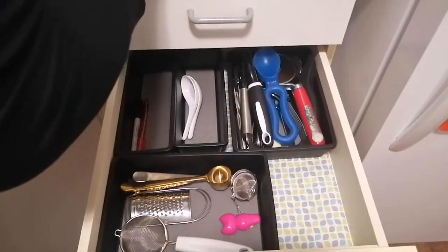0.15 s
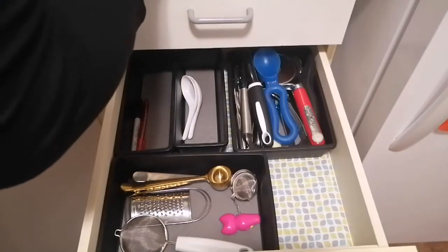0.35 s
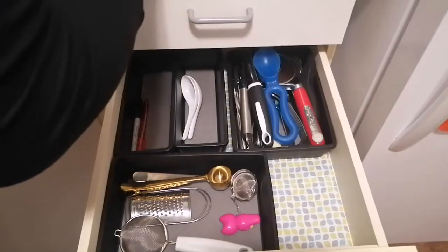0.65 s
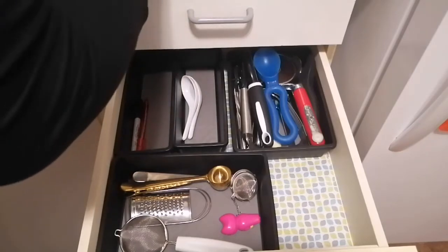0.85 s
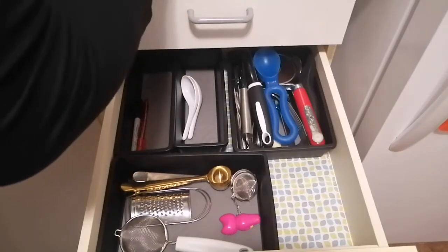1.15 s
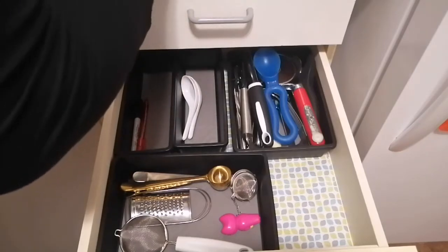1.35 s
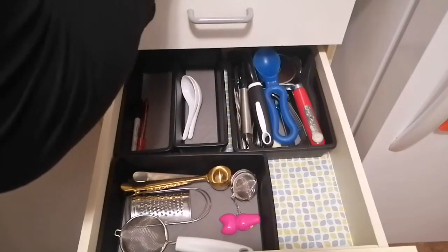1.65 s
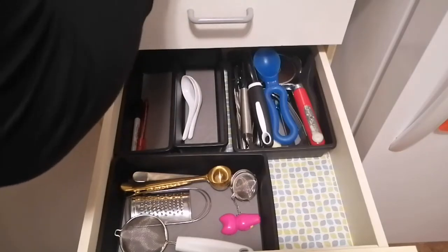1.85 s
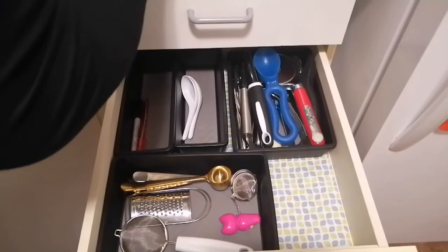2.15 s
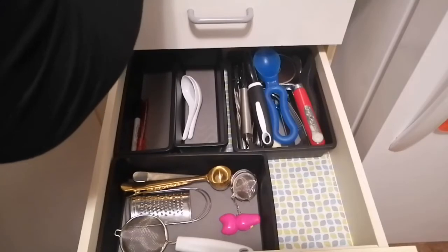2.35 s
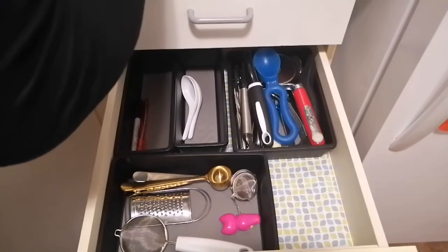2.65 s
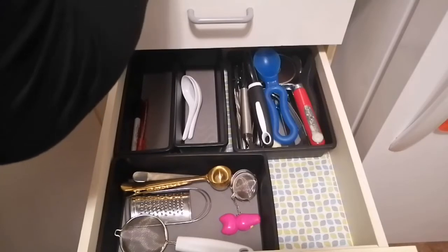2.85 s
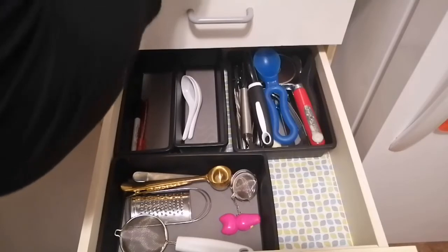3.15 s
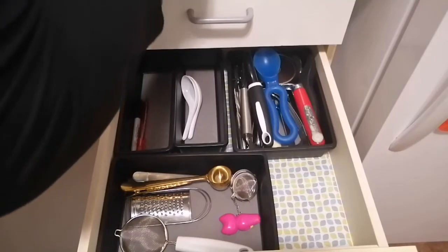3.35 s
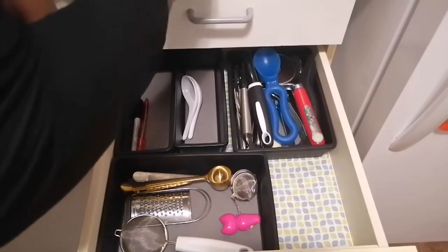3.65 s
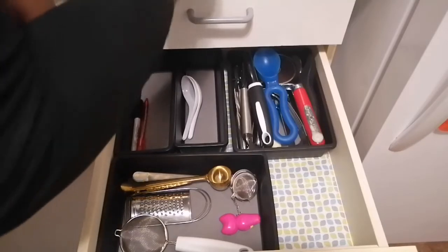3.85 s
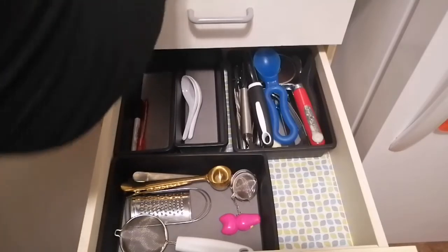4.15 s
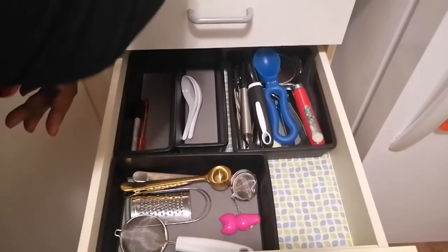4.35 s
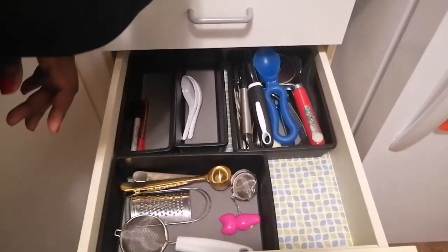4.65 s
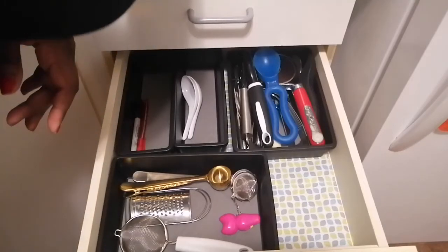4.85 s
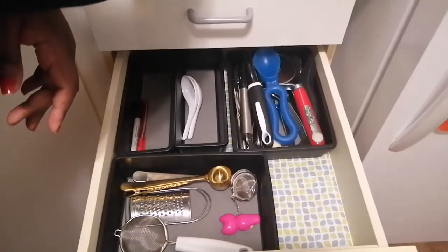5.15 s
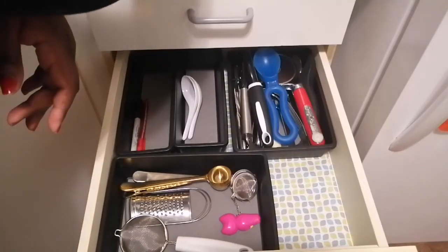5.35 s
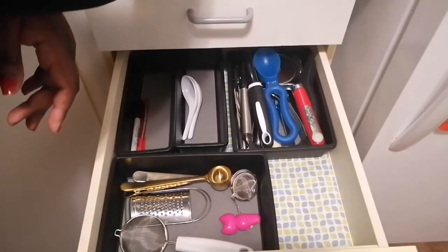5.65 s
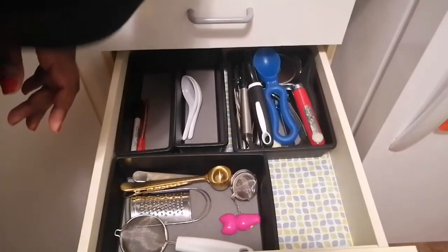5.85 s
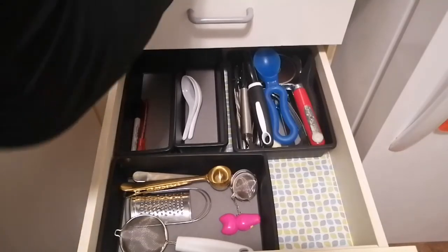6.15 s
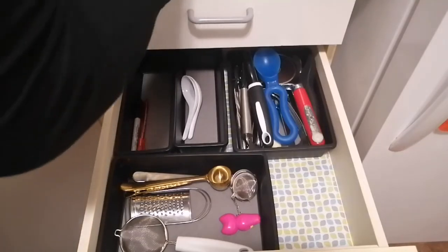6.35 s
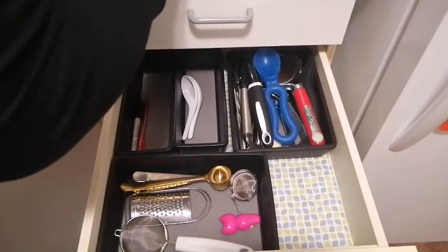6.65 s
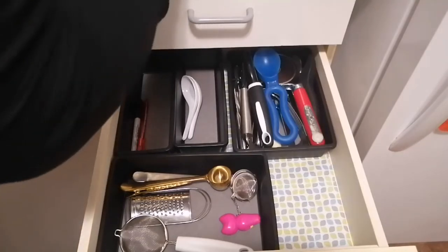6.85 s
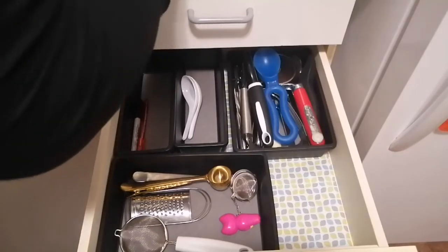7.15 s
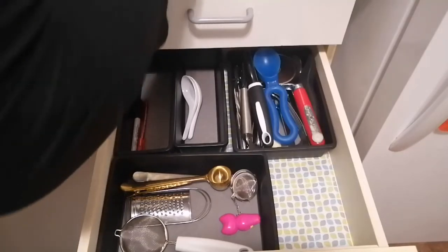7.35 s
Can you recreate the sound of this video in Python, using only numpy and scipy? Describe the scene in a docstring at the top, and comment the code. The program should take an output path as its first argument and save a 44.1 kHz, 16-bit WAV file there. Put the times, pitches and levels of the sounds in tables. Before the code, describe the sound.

Irregular rattling of kitchen utensils in plastic trays, heard from about a metre with short room reverberation. It begins softly with a knock, thump and rub, continues as small double knocks and scrapes, thins out, then a ringing metal clink leads into firmer knocks and one loud clack. A pause, a low cabinet thump and quick high clinks follow, ending in busy light knocking and dragging.

```python
"""A light knock, a soft thump and a gritty rub come first, as someone rummages through a kitchen drawer.
Utensils knock on plastic trays (noise impulses plus tray modes) and metal clinks (beating modes).
Things drag over the tray floor (filtered stick-slip pulses); short resonant noises (such pulses driving
a mode) are scrapes and parts of clinks; the cabinet thumps (decaying modes) over faint air (noise).
The small, hard-walled room adds a short reverberation, heard from a metre or so."""
import sys
import numpy as np
from scipy import signal
from scipy.fft import rfft, irfft
from scipy.io import wavfile

SR = 44100
rng = np.random.default_rng(int(sys.argv[2]) if len(sys.argv) > 2 else 0)


def unload_audio(sound):
    """Save the sound as a 16-bit wav file, at the path given as the first command line argument."""
    columns = np.transpose(np.atleast_2d(sound))
    # keep every value between -1 and 1, then stretch to whole-number steps
    steps = np.round(np.clip(columns, -1, 1) * 32767)
    wavfile.write(sys.argv[1], SR, steps.astype(np.int16))


N = 330750  # samples, 7.5 s
TOP_HZ = 15100  # upper limit of the sound


def undb(db):
    """Amplitude ratio: 20 dB is a factor of ten."""
    return 10 ** (np.asarray(db) / 20)


def rms(x):
    """Effective value: root mean square of all samples."""
    return np.sqrt(np.mean(x ** 2)) + 1e-12


def seconds(length):
    """Uniform sampling: the sample times of a stretch of this length [s]."""
    return np.arange(int(length * SR)) / SR


def fade(t, t60):
    """Viscous damping: exponential decay, 60 dB down after t60 [s]."""
    return np.exp(-np.log(1000) * t / max(t60, 1e-4))


def at_hz(table, hz):
    """Logarithmic pitch: interpolate (frequency, value) points on a log-frequency axis."""
    points, values = np.transpose(table)
    return np.interp(np.log(np.maximum(hz, 1)), np.log(points), values)


def band(x, lo, hi, order=3):
    """Causal Butterworth band-pass: maximally flat between two cut-offs [Hz]."""
    sos = signal.butter(order, [lo, min(hi, SR / 2 - 1)], "band", fs=SR, output="sos")
    return signal.sosfilt(sos, x)


def colour(x, spectrum, size=2048):
    """Minimum phase: folding the cepstrum of a (frequency, dB) spectrum gives a causal filter."""
    gain = undb(at_hz(spectrum, np.fft.rfftfreq(size, 1 / SR)))
    cepstrum = irfft(np.log(gain))
    cepstrum[1:size // 2] *= 2
    cepstrum[size // 2 + 1:] = 0
    impulse = irfft(np.exp(rfft(cepstrum)))
    return signal.fftconvolve(x, impulse)[:len(x)]


def tilted(spectrum, db_per_octave):
    """Contact sharpness: a sharper contact lifts the treble of a spectrum, a blunter one lowers it."""
    return [(hz, db + db_per_octave * np.log2(max(hz, 400))) for hz, db in spectrum]


def boost(x, resonances):
    """Resonance: lift the bands where an object resonates and lower those between its modes."""
    for hz, width, db in resonances:
        x = x + (undb(db) - 1) * band(x, max(hz - width / 2, 30), hz + width / 2, order=1)
    return x


def ring(modes, t, scatter_db, detune):
    """Modal superposition: decaying sines, weighted differently by each contact point."""
    chance = rng.standard_normal((len(modes), 3))
    total = 0
    for (hz, db, t60), (size, shift, sign) in zip(modes, chance):
        amplitude = np.sign(sign) * undb(db + scatter_db * size)
        total = total + amplitude * np.sin(2 * np.pi * hz * (1 + detune * shift) * t) * fade(t, t60)
    return total


def slips(count, rate, spread_db):
    """Stick-slip friction: tiny releases at random moments (rate per s), a few much bigger than the rest."""
    released = rng.random(count) < rate / SR
    direction = rng.choice([-1, 1], count)
    size_db = spread_db * np.minimum(rng.exponential(size=count), 4)
    x = released * direction * undb(size_db)
    return x / rms(x)


def diffuse(count, apart_hz=800):
    """Diffuse field: noise from all sides, more alike at the two microphones in the bass than above."""
    mid, side = rng.standard_normal((2, count))
    high_pass = signal.butter(1, apart_hz, "high", fs=SR, output="sos")
    side = 0.22 * side + 0.8 * signal.sosfilt(high_pass, side)
    return np.array([mid + side, mid - side])


def reverberation():
    """Frequency-dependent absorption: each octave of a noise tail dies at its own rate; unit energy."""
    # decay time of the kitchen: (frequency [Hz], t60 [s])
    decay_times = [(120,0.29),(400,0.28),(1000,0.26),(3000,0.35),(7000,0.33),(13000,0.056)]
    t = seconds(.6)
    spectrum, hz = rfft(diffuse(len(t))), np.fft.rfftfreq(len(t), 1 / SR)
    octave = np.clip(np.log2(np.maximum(hz, 1) / 125), 0, 7)
    tail = 0
    for k in range(8):
        weight = np.maximum(1 - abs(octave - k), 0)  # overlapping triangles
        tail = tail + irfft(spectrum * weight, len(t)) * fade(t, at_hz(decay_times, 125 * 2 ** k))
    tail = tail * (1 - fade(t, 0.0054))  # reflections build up after the direct sound
    return tail / np.sqrt(np.sum(tail ** 2) / 2)


def in_kitchen(x, direct_db, tail):
    """Convolution with a room response: direct sound, up to 3 samples later on the right, plus its tail."""
    response = tail.copy()
    response[0, 0] += undb(direct_db)
    response[1, rng.integers(4)] += undb(direct_db)
    return signal.fftconvolve(x[None], response, axes=1)[:, :len(x)]


def onset_level(x, db):
    """Onset level: scale a sound so that its first 25 ms have this rms level [dB]."""
    return x * undb(db) / rms(x[:, :SR // 40])


def add(out, s, sound):
    """Linear superposition: mix a stereo sound in at time s [s]."""
    start = max(int(s * SR), 0)
    out[:, start:start + sound.shape[1]] += sound[:, :N - start]


def room_tone():
    """Stationary diffuse noise: the faint steady air of the kitchen."""
    # spectrum of the air: (frequency [Hz], relative level [dB])
    air_spectrum = [(12, -31), (20, 2.5), (674, -15), (1080, -12.5), (1210, -17), (1550, -13.5),
                    (1830, -19), (2550, -17), (3360, -22), (5850, -23.5), (8380, -33), (9630, -27.5),
                    (15000, -55)]
    gain = undb(at_hz(air_spectrum, np.fft.rfftfreq(N, 1 / SR)))
    air = irfft(rfft(diffuse(N, apart_hz=25)) * gain, N)
    return air / rms(air) * undb(-67)


def thumps(tails):
    """Forced, then free vibration: a soft push swells one low panel mode, which then dies away."""
    # bumps against the cabinet: (time [s], onset level [dB], mode [Hz], push length [s])
    bumps = [(0.0,-57.5,156,0.005),(1.478,-53,152,0.042),(2.385,-55.5,155,0.022),(2.54,-53,152,0.014),(3.20,-65,207,0.047),(3.998,-51.5,169,0.025),(4.004,-66,310,0.0073),(6.138,-47,198,0.035),(6.139,-65,88,0.048),(6.14,-59,327,0.0069)]
    out, t = np.zeros((2, N)), seconds(.5)
    for k, (s, db, hz, length) in enumerate(bumps):
        peak_s = length / 2  # the push is strongest halfway; the mode decays from there
        swell = np.sin(np.pi / 2 * np.minimum(t / peak_s, 1)) ** 2
        panel = np.sin(2 * np.pi * hz * t) * swell * fade(np.maximum(t - peak_s, 0), 0.066)
        wet = in_kitchen(panel, direct_db=0.5, tail=tails[k % len(tails)])
        add(out, s, onset_level(wet, db))
    return out


def resonant_noises(tails):
    """Pulse-driven resonance: random pulses excite a mode whose frequency sags during each short noise."""
    # short resonant noises: edges scraping or squeaking over plastic, and noisy parts of the metal clinks:
    # (time [s], length [s], level [dB], midway resonance [Hz], resonance width [Hz])
    bursts = [(0.0,0.24,-71,3060,197), (0.0,0.27,-69.5,860,108), (0.238,0.019,-45,676,460),
              (0.322,0.012,-49,570,344), (0.345,0.036,-60,400,153), (0.613,0.015,-46,3500,1800),
              (0.63,.05,-53.5,640,500), (0.89,0.053,-71.5,2610,160), (1.0,0.046,-74.5,10700,3000),
              (1.36,0.034,-66,1045,300), (1.965,0.034,-52.5,2080,794), (1.965,0.07,-60.5,560,400),
              (2.14,.15,-64.5,1186,240), (2.17,0.11,-64,2140,600), (2.5,0.044,-54.5,2100,940),
              (2.86,0.15,-67.5,3730,1330), (3.11,0.067,-71,1610,149), (3.472,0.014,-61,2150,218),
              (3.50,.059,-58,670,254), (3.52,0.13,-64.5,3600,1200), (3.585,0.036,-50.5,613,200),
              (3.655,0.037,-61,1970,220), (3.675,0.025,-50,5300,1500), (3.925,0.03,-68,2250,447),
              (4.06,0.035,-61.5,2270,496), (4.745,.072,-47,470,460), (4.762,0.022,-53,3180,200),
              (4.815,0.027,-48,436,450), (4.89,0.043,-59,815,387), (4.9,0.027,-54,2440,1300),
              (5.78,.052,-48,1980,950), (5.83,0.073,-61,1480,900), (6.29,0.031,-69,4800,1200),
              (6.29,.05,-46.5,10700,1800), (6.325,0.016,-56.5,2550,150), (6.64,0.0255,-49,1550,295),
              (6.714,0.016,-40,554,345), (6.745,0.015,-59,416,170), (6.922,0.027,-49,620,255),
              (6.965,0.084,-46.5,615,240), (7.065,0.012,-40,670,418), (7.105,0.018,-51.5,430,185),
              (7.25,0.13,-59,4030,2450), (7.28,0.079,-55,377,124), (7.44,0.091,-59,1700,910)]
    sag = 0.02  # share by which the resonance falls during a burst
    out, t = np.zeros((2, N)), seconds(.6)
    for k, (s, length, db, hz, width_hz) in enumerate(bursts):
        progress = np.minimum(t / max(length, .005), 1)
        strength = np.sqrt(abs(np.sin(np.pi * progress)))
        push = slips(len(t), rate=1100, spread_db=3.0) * strength
        # shift the moving resonance to 0 Hz, low-pass there, and shift back
        turn = np.exp(2j * np.pi * np.cumsum(hz * (1 + sag * (.5 - progress))) / SR)
        low_pass = signal.butter(2, width_hz / 2, fs=SR, output="sos")
        tone = np.real(turn * signal.sosfilt(low_pass, push / turn))
        wet = in_kitchen(band(tone, 307, 6400), direct_db=-0.5, tail=tails[k % len(tails)])
        add(out, s, wet * undb(db) / rms(wet[:, progress < 1]))
    return out


def drag(tails):
    """Stick-slip under varying load: gritty slips of plastic on plastic follow the hand's pressure."""
    # strokes over the trays: (time [s], length [s], level [dB], brightness [dB per octave])
    strokes = [(0.0,0.084,-62.5,-1.5), (0.33,0.52,-73,-3), (0.59,0.12,-54,1), (0.84,0.18,-80,3),
               (1.27,0.15,-67,0.5), (1.55,0.44,-80,1.5), (1.91,0.26,-59,0), (2.08,0.29,-64.5,0),
               (2.46,0.092,-63,-2), (2.8,0.17,-68,1), (2.99,0.22,-69.5,2.5), (3.24,0.19,-72,-0.5),
               (3.42,0.12,-63,5), (3.58,.2,-101,-15), (4.665,0.2,-54.5,3.5), (4.89,0.026,-54.5,2),
               (5.02,0.11,-57,7), (5.25,0.15,-57,1.5), (5.54,0.24,-67,3.5), (5.79,0.17,-55.5,4),
               (6.7,0.13,-55.5,.5), (6.92,0.057,-55,5), (7.09,0.18,-65,-3), (7.23,0.22,-57,2)]
    # spectrum of the rub before tilting: (frequency [Hz], relative level [dB])
    rub_spectrum = [(59, -61), (100, 9), (268, 1), (383, -1.5), (546, -3), (923, 1.5), (1240, -4.5),
                    (1560, -1), (1810, -9.5), (2180, -3), (2750, -9.5), (5600, -18), (15000, -38)]
    low_hz = 130  # the trays radiate little below this
    swell, let_go_s = 0.05, 0.016  # pressure builds over this share of a stroke, holds, then drops
    out, t = np.zeros((2, N)), seconds(1)
    for k, (s, length, db, brightness) in enumerate(strokes):
        rise = t / (swell * length)
        drop = 1 - (t - length) / let_go_s
        pressure = np.clip(np.minimum(rise, drop), 0, 1)
        rub = pressure * slips(len(t), rate=900, spread_db=6)
        grit = colour(rub, tilted(rub_spectrum, brightness))
        wet = band(in_kitchen(grit, direct_db=-8.5, tail=tails[k % len(tails)]), low_hz, TOP_HZ)
        add(out, s, wet * undb(db) / rms(wet[:, t < length + let_go_s]))
    return out


def clinks(tails):
    """Beating of near-equal modes: metal meets metal, and loose contact chatters for a moment."""
    # metal contacts: (time [s], onset level [dB], utensil)
    contacts = [(0.238,-67,"wire"),(0.614,-56.5,"wire"),(0.690,-62,"wire"),(1.474,-58,"wire"),(2.055,-73,"wire"),(2.445,-71,"wire"),
                (3.9075,-39,"spoon"),(3.924,-49,"ladle"),(4.058,-56.5,"ladle"),(4.082,-46,"ladle"),(4.092,-52,"ladle"),(4.135,-103,"ladle"),
                (6.222,-58.5,"spoon"),(6.288,-39.5,"fork"),(6.303,-44,"fork"),(6.316,-38.5,"fork"),(6.372,-47.5,"fork"),(6.462,-71,"fork"),(7.025,-63,"wire"),(7.025,-54,"ladle")]
    # modes of each utensil: (frequency [Hz], relative level [dB], t60 before further damping [s])
    metal = { "spoon": [(6223,-4,.15),(6681,-6,.13),(8800,3,.2),(9259,-12,.2),(10010,-6,.18),(10160,-8,.22),(10360,0,.16),(11120,-10,.1),(12880,-16,.2),(14040,-13,.14)],
             "ladle": [(6240,-12,.1),(6700,0,.24),(8810,-3,.2),(10250,-9,.15),(12880,-14,.17),(14040,-17,.14)],
             "fork": [(2428,-15,.25),(5604,-18,.2),(6282,-19,.2),(7004,-1,.2),(8791,-11,.2),(10310,-9,.2),(10945,0,.17),(11155,-5,.16),(12035,-4,.18),(12895,-6,.16),(14440,-14,.16)],
             "wire": [(9550,-4,.1),(11250,-3,.11),(11520,0,.14),(12900,-8,.12)]}
    # where each piece lies: left minus right [dB]
    pan_db = {"spoon": 2, "ladle": 0, "fork": -1, "wire": 2}
    out, t = np.zeros((2, N)), seconds(.6)
    for k, (s, db, utensil) in enumerate(contacts):
        modes = metal[utensil]
        tone = ring(modes, t, scatter_db=1, detune=.0002) * fade(t, 1.2)
        # touching pieces of nearly the same shape ring close by and beat with it
        neighbours = sum(ring(modes, t, scatter_db=2, detune=.012) for _ in range(3))
        rattle = band(slips(len(t), rate=4000, spread_db=1.5), 6000, 10500, order=2)
        chatter = undb(1) * rattle * fade(t, .15)
        jingle = tone + undb(-7) * neighbours * fade(t, .4) + chatter
        place = undb(pan_db[utensil] * np.array([[1], [-1]]) / 2)
        wet = in_kitchen(jingle, direct_db=-2.0, tail=tails[k % len(tails)])
        add(out, s, onset_level(place * wet, db))
    return out


def knocks(tails):
    """Impact excitation: a contact cracks, the utensil buzzes briefly, tray modes ring and the drawer booms."""
    # utensil blows: (time [s], onset level [dB], brightness [dB per octave],
    # hardness [dB], which is the direct level against the reverberation)
    blows = [(0.004,-54,-7.5,-5.5), (0.238,-49.5,-0.5,-6), (0.29,-50,-5.5,-8), (0.613,-47.5,-0.5,-12),
             (0.673,-47.5,1.5,-6), (0.691,-39,-1.5,-4.5), (0.697,-46,0,6), (1.451,-42,-1.3,-5.5),
             (1.475,-39,1.6,-3.5), (1.497,-50.5,-4,-9), (1.879,-55,4.5,-6), (1.912,-53,4,-10),
             (1.938,-62,-5,-13), (2.056,-51,6.5,-5.5), (2.349,-63,3.5,1), (2.379,-50,3.5,-9),
             (2.444,-41.5,4.5,-1), (2.504,-53,0,1), (2.752,-53,1.5,-4), (2.772,-52.5,3.5,-5.5),
             (2.99,-62.5,0.5,-2), (3.673,-46.5,-1,-18), (4.470,-35,-1.3,-6), (4.495,-38,1.5,.5),
             (4.5275,-39.5,0,14), (4.544,-43,-1.5,-21), (4.701,-53,2.5,0), (4.727,-49,-1.3,-4.5),
             (4.764,-46,0,7.5), (4.826,-56,-10,6), (4.997,-43.5,2.5,7), (5.002,-40,2,-2.5),
             (5.022,-43.5,1.5,-10), (5.191,-28.5,-1.8,-5.5), (5.201,-34.5,-1.5,-2.5), (5.881,-62,-1.5,0),
             (5.91,-51,-0.5,-3), (6.635,-59.5,-3.5,3), (6.649,-49,-6.5,-13), (6.698,-48.5,5.2,-14),
             (6.719,-58,-.5,5), (6.783,-43.5,0,-4.5), (6.842,-44.5,-3,-1), (7.025,-46.5,5.5,-3),
             (7.049,-41,-3.5,-3), (7.062,-39,-0.6,0.5), (7.075,-44,-14.5,3), (7.13,-41.5,-.5,-6.5)]
    # spectrum of a blow before tilting: (frequency [Hz], relative level [dB])
    blow_spectrum = [(60,-16),(140,4),(270,-5),(400,-10),(900,0),(1500,-0.5),(3200,-1),(4700,-5),(7500,-9.5),(10000,-12.5),(11500,-24.5),(15000,-35)]
    # modes of the loaded tray and drawer: (frequency [Hz], relative level [dB], t60 [s])
    tray_modes = [(120,-12,0.21),(142,-4,0.24),(212,-11.5,0.47),(361.8,4.5,0.19),(395.5,2.5,0.32),(624.4,3.5,0.15),(913,-1.5,0.069),(970,-1,0.069),(1110,-11.5,0.24),
                  (2990,-2,0.2),(3120,-4,0.084),(3315,2.5,0.16),(3414,-0.5,0.067),(3770,8,0.08)]
    # the utensil in hand from each time on: (time [s], how hard its weight shakes the drawer [dB],
    # its broad peaks and dips as a list of (frequency [Hz], width [Hz], gain [dB]))
    in_hand = [(0, -5, [(1050,150,4.5),(2210,1550,14),(6170,2200,6),(12900,2800,15.5)]),
               (1.2, 13.5, [(1050,240,10.5),(2250,1050,16),(6100,1900,8),(13000,3000,15)]),
               (1.8, 8.5, [(1100,73,21),(2430,1600,10.5),(11600,2000,-5)]),
               (2.7, 8.5, [(1300,230,6),(2710,190,7),(4420,810,9),(14200,2400,22.5)]),
               (4.4, 1.5, [(382,140,10),(1010,110,6),(2640,420,7.5),(4040,370,2.5),(9350,560,1.5)]),
               (5.1, -5, [(580,140,8),(2100,900,-7),(3340,900,4),(9400,530,4.5),(12800,1340,18)]),
               (6.6, -6.5, [(592,51,16),(1860,920,13),(5670,180,8.5),(9000,1300,2)])]
    drawer_hz, drawer_width_hz = 147, 180  # the boom of the drawer box
    low_hz = 115  # the trays radiate little below this
    out, t = np.zeros((2, N)), seconds(.6)
    for k, (s, db, brightness, hardness_db) in enumerate(blows):
        # a square blow is one sharp pulse; a glancing one chatters and is heard mostly through the room
        buzz = undb(-23.0 - hardness_db) * fade(t, 0.069)
        envelope = (fade(t, .007) + buzz) * (1 - fade(t, .003))
        crack = rng.standard_normal(len(t)) * envelope
        tray = undb(-30.5) * ring(tray_modes, t, scatter_db=2, detune=0.0025)
        _, weight_db, resonances = [utensil for utensil in in_hand if utensil[0] <= s][-1]
        struck = boost(crack, resonances) + tray
        blow = boost(struck, [(drawer_hz, drawer_width_hz, weight_db)])
        coloured = colour(blow, tilted(blow_spectrum, brightness))
        wet = in_kitchen(coloured, hardness_db, tails[k % len(tails)])
        add(out, s, onset_level(band(wet, low_hz, TOP_HZ, order=4), db))
    return out


def scene():
    """Superposition of sources: twelve spots in the drawer each reach the walls by their own paths."""
    tails = [reverberation() for _ in range(12)]
    background = room_tone() + thumps(tails)
    return background + resonant_noises(tails) + drag(tails) + clinks(tails) + knocks(tails)


def record(dry):
    """Transducer response: each microphone has its own slight colour, and the top is cut steeply."""
    # microphone balance: (frequency [Hz], left minus right [dB])
    balance = [(60, -21), (110, 1.5), (200, 0), (380, 1.0), (700, -1), (1290, -1), (2380, -0.5),
               (4400, 0.5), (8120, 1.5), (15000, -2)]
    lean_db = at_hz(balance, np.maximum(np.fft.rfftfreq(N, 1 / SR), 95))  # constant below 95 Hz
    heard = irfft(rfft(dry) * undb(np.array([lean_db, -lean_db]) / 2), N)
    low_pass = signal.ellip(8, .2, 70, TOP_HZ, fs=SR, output="sos")
    return signal.sosfilt(low_pass, heard)


dry = scene()
out = record(dry)
unload_audio(out)
```